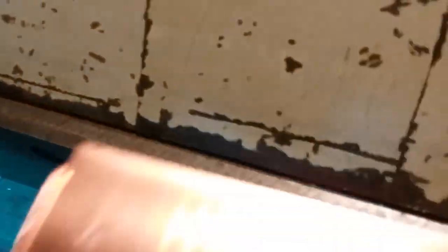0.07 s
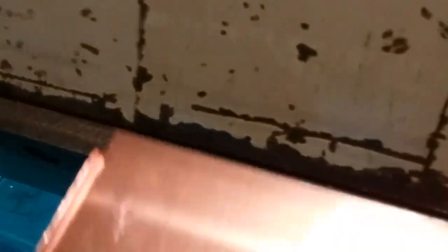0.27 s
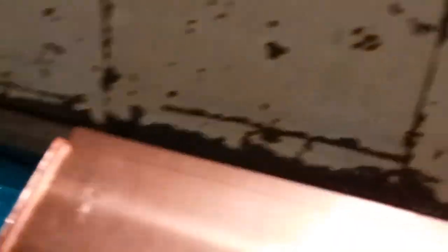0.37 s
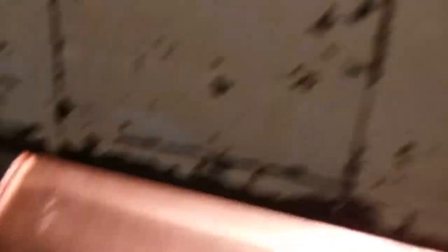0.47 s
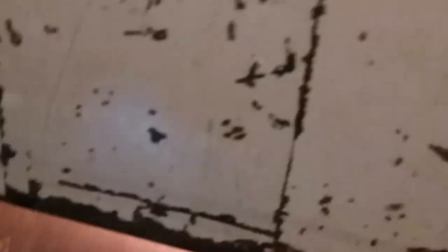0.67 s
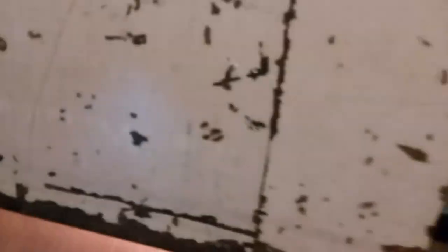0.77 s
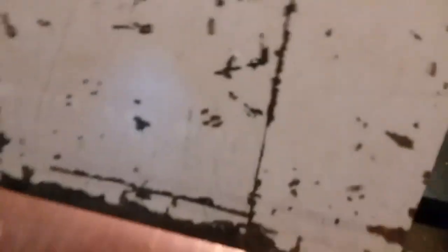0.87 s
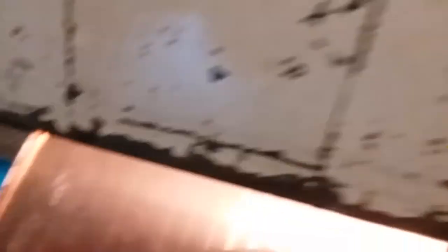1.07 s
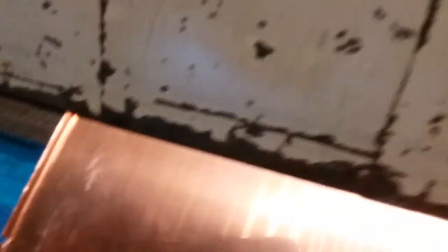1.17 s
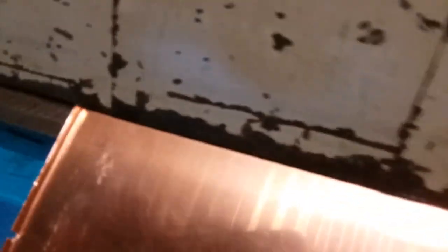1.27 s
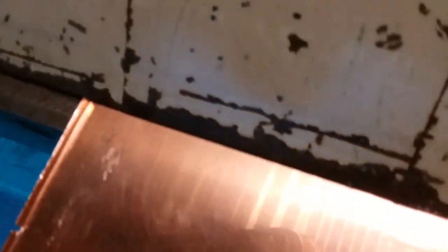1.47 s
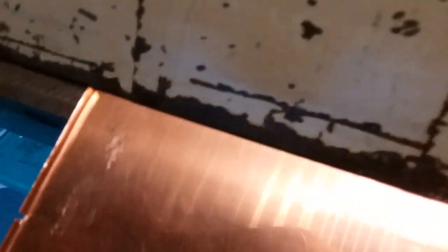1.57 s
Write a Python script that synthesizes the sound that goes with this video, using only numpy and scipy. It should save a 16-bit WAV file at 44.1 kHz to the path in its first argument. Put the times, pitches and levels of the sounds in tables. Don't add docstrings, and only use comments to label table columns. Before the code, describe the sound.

Metal sheet handled on a bending machine, close up: a faint earlier ring and gritty edge scrape, then a loud clattering slam at 0.2 s with rapid bounces. A mid-pitched clank follows at 0.35, dull thuds from 0.45, a lighter clink at 0.51 with short scrapes. A clamp snaps at 0.88, a tap at 1.0, then sparse, fading taps until about 1.57, over a short workshop tail and very quiet hum.

```python
import sys
import numpy as np
from scipy import signal
from scipy.fft import rfft, irfft
from scipy.io import wavfile

SR = 44100
rng = np.random.default_rng(int(sys.argv[2]) if len(sys.argv) > 2 else 0)


def dump_mix(stems):
    frames = np.atleast_2d(stems).T
    limited = np.clip(frames, -1, 1)
    pcm = np.round(limited * 32767).astype(np.int16)
    wavfile.write(sys.argv[1], SR, pcm)


def attenuation_scalar(level_db):
    decades = np.asarray(level_db, float) / 20
    return 10 ** decades


N = 70560
LEFT_LAG = 16


def evened(x):
    return x / np.sqrt(np.mean(x ** 2) + 1e-20)


def read(points, hz):
    f, value = np.transpose(points)
    return np.interp(np.log(hz + 1), np.log(f + 1), value)


def add(mix, s, sound, pan_db=0, lag=0):
    at = round(s * SR)
    sound = np.array([np.pad(sound[0], (lag, 0)), np.pad(sound[1], (0, lag))])
    sound = sound[:, max(-at, 0):] * attenuation_scalar(np.array([[.5], [-.5]]) * pan_db)
    part = mix[:, max(at, 0):][:, :sound.shape[1]]
    part += sound[:, :part.shape[1]]


# frequency in Hz, left-right likeness (0 to 1).
PORT_LIKENESS = [(60, 0.96), (500, 0.94), (1000, 0.5), (4000, 0.45), (16000, 0.45)]


def ports(hz, z):
    same = np.clip(read(PORT_LIKENESS, hz), 0, 1)
    return np.array([z[0], same * z[0] + np.sqrt(1 - same ** 2) * z[1]])


def coloured(x, tone):
    n = x.shape[-1]
    return irfft(rfft(x) * attenuation_scalar(read(tone, np.fft.rfftfreq(n, 1 / SR))), n)


def ring(hz, size, t60, size_n=11000, crack=1):
    rise_cycles = 0.96
    crack_height, crack_s = 0.59, 0.0035
    length = min(size_n, int(np.max(t60) * SR) + 400)
    t = np.arange(length, dtype=np.float32) / np.float32(SR)
    spin = 2j * np.pi * hz - np.log(1000) / np.maximum(t60, .004)
    waves = np.exp(np.outer(spin.astype(np.complex64), t))
    waves *= np.minimum(np.outer((hz / rise_cycles).astype(np.float32), t), 1)
    fade_out = np.minimum(4 - 4 * t / t[-1], 1)
    first_contact = 1 + crack * crack_height * np.exp(-t / crack_s)
    return (size.astype(np.complex64) @ waves).imag * fade_out * first_contact


def plate(tone, t60s, scale, tilt_db=0, lean=((1, 0), (2, 0)), count=260, size_n=7000, top=16100,
          pitch=None, crack=1):
    mode_spread_db, phase_spread = 4, .7
    pitch_db, pitch_octaves = 9, 0.2
    draw = rng.random((count, 4))
    u = (np.arange(count) + draw[:, 0]) / count
    hz = 50 + (top - 50) * u ** 2
    db = read(tone, hz) + 10 * np.log10(u + 0.015) + tilt_db * np.log2(hz / 1000)
    db += mode_spread_db * 2 * (draw[:, 1] - .5)
    if pitch:
        db += pitch_db * np.exp(-.5 * (np.log2(hz / pitch) / pitch_octaves) ** 2)
    starts = np.exp(2j * np.pi * phase_spread * (draw[:, 2:].T - .5))
    size = ports(hz, starts) * attenuation_scalar(db + np.outer([.5, -.5], read(lean, hz)))
    size = size / np.sqrt(0.28 * np.sum(abs(size) ** 2))
    return ring(hz, size, read(t60s, hz) * scale, size_n=size_n, crack=crack)


def tuned(modes, db):
    modes_apart, port_turn = .3, .12
    hz, level_db, t60 = np.transpose(modes)
    turn = modes_apart * rng.random(len(hz)) + port_turn * rng.uniform(-1, 1, (2, len(hz)))
    return ring(hz, np.exp(2j * np.pi * turn) * attenuation_scalar(level_db + db), t60, size_n=SR // 2)


# start in seconds, level in dB, ring scale.
SLAMS = [
    (0.2056, -17, 0.35),
    (0.207, -23.5, 0.83),
    (0.2141, -23.5, 1.54),
    (0.2268, -18.5, 0.62),
    (0.2299, -24.5, 0.73),
    (.239, -28, 0.73),
    (0.265, -35, 0.61),
    (0.276, -42.5, 0.12),
]
# frequency in Hz, level in dB.
SLAM_TONE = [(35, -34.5), (60, -11), (330, -4.5), (503, -7.5), (1860, -3), (3580, -10), (4120, -12),
             (5330, -12), (16000, -7)]
# frequency in Hz, T60 in seconds.
SLAM_T60 = [(80, 0.17), (400, 0.19), (2000, 0.2), (6000, 0.26), (16000, 0.11)]
# frequency in Hz, left minus right in dB.
SLAM_LEAN = [(60, -3.5), (240, -6.5), (950, 0), (3770, -2.5), (15000, -1.5)]
# frequency in Hz, level in dB, T60 in seconds.
SHEET_MODES = [(135, -4, .12), (318, -6, .14), (379, -7, .08), (836, -9, .09), (995, -2, .04),
               (1620, -1, .025), (1975, -1, .03), (2105, -9, .16), (2632, -10, .14), (3000, -5, .03),
               (3257, -12, .14), (4527, -12, .15)]


def slams():
    out = np.zeros((2, N))
    for s, db, scale in SLAMS:
        add(out, s, attenuation_scalar(db) * plate(SLAM_TONE, SLAM_T60, scale, lean=SLAM_LEAN, size_n=3200), lag=LEFT_LAG)
    for s, db, scale in SLAMS[:4:3]:
        add(out, s, tuned(SHEET_MODES, db - 9))
    return out


# level in dB, ring scale, left minus right in dB.
CLANK = (-22.5, 1, 0)
# frequency in Hz, level in dB.
CLANK_TONE = [(60, -22), (600, -8.5), (1400, -2), (2500, -8.5), (4300, -22.5), (5000, -30.5), (16000, -28)]
# frequency in Hz, T60 in seconds.
CLANK_T60 = [(80, 0.18), (500, 0.12), (2000, 0.17), (5000, 0.18), (16000, 0.12)]
# frequency in Hz, level in dB, T60 in seconds.
CLANK_MODES = [(280, -12, .1), (517, -13, .1), (716, -15, .08), (968, -11, .07), (1410, 0, .045),
               (1560, -2, .035), (1790, -8, .1), (1927, -12, .17), (2094, -12, .15), (2466, -13, .12),
               (3000, -7, .04)]


def clank():
    out, s = np.zeros((2, N)), .3542
    db, scale, pan_db = CLANK
    add(out, s, attenuation_scalar(db) * plate(CLANK_TONE, CLANK_T60, scale), pan_db, lag=LEFT_LAG)
    add(out, s, tuned(CLANK_MODES, -21.5), pan_db)
    return out


# level in dB, ring scale, left minus right in dB.
CLINK = (-32.5, 0.66, 0)
# frequency in Hz, level in dB.
CLINK_TONE = [(180, -38), (300, 3), (1530, 0.5), (2480, 2), (3080, -23), (3460, -22), (4370, -13.5),
              (16000, -13.5)]
# frequency in Hz, T60 in seconds.
CLINK_T60 = [(300, 0.0333), (2200, 0.42), (3500, 0.25), (16000, 0.057)]
# frequency in Hz, level in dB, T60 in seconds.
CLINK_MODES = [(920, -9, .04), (1986, -11, .1), (2207, -17, .2), (2509, 0, .07), (2805, -18, .1),
               (7790, -18, .05)]
# frequency in Hz, level in dB, T60 in seconds.
FRAME_MODES = [(588, -2, 1.06), (2150, -6, 0.68), (2160, -12, 1.06), (2240, -12.5, 0.71)]


def clink():
    out, s = np.zeros((2, N)), .5141
    db, scale, pan_db = CLINK
    add(out, s, attenuation_scalar(db) * plate(CLINK_TONE, CLINK_T60, scale), pan_db, lag=LEFT_LAG)
    add(out, s, tuned(CLINK_MODES, -26), pan_db)
    add(out, s, tuned(FRAME_MODES, -53.5))
    return out


# start in seconds, level in dB, ring scale.
THUDS = [(0.4499, -36, 0.75), (.467, -35, 1.5), (.479, -37, 0.72), (0.498, -37.5, 0.79), (.52, -40, 1.4),
         (.552, -42.5, 2.1), (.607, -44.5, 0.82), (.68, -56.5, 1.5), (.731, -49, 0.87), (.887, -44, 0.68),
         (0.9989, -45, 0.35), (1.244, -51, 0.41)]
# frequency in Hz, level in dB.
THUD_TONE = [(50, -25), (110, -8.5), (245, -3), (500, -16), (800, -21), (3000, -39.5)]
# frequency in Hz, T60 in seconds.
THUD_T60 = [(60, 0.13), (250, 0.16), (2500, 0.27)]
# frequency in Hz, left minus right in dB.
THUD_LEAN = [(60, 1.5), (250, -4), (1000, 1)]


def thuds():
    out = np.zeros((2, N))
    for s, db, scale in THUDS:
        blow = plate(THUD_TONE, THUD_T60, scale, lean=THUD_LEAN, count=60, top=3000, crack=0)
        add(out, s, attenuation_scalar(db) * blow)
    return out


# start in seconds, swell in seconds, fade in seconds, level in dB.
SCRAPES = [
    (-.03, 0.025, 0.047, -45.5),
    (0.018, 0.1, 0.055, -44.5),
    (0.331, 0.017, 0.013, -53),
    (0.38, 0.078, 0.056, -57),
    (.494, 0.0076, 0.024, -46.5),
    (0.577, 0.031, 0.0068, -49.5),
    (0.799, 0.049, 0.036, -65),
    (.13, 0.044, 0.06, -58),
]
# frequency in Hz, level in dB.
SCRAPE_TONE = [(35, -56.5), (60, -6), (666, -9.5), (749, -7.5), (2970, -14), (6900, -16), (9350, -17.5),
               (11800, -14.5), (16000, -15)]
# frequency in Hz, width in Hz, level in dB.
SCRAPE_PEAKS = [(1955, 60, -2.5), (2270, 50, -3.5), (2950, 130, -9)]


def scrapes():
    slips_per_s, slip_spread_db, ring_db = 2200, -0.5, -11.5
    slips = (rng.random((2, N)) < slips_per_s / SR) * rng.choice([-1., 1.], (2, N))
    slips = slips * attenuation_scalar(slip_spread_db * np.minimum(rng.exponential(1, (2, N)), 2))
    hz = np.fft.rfftfreq(N, 1 / SR)
    peaks = sum(attenuation_scalar(db) / (1 + 2j * (hz - f) / w) for f, w, db in SCRAPE_PEAKS)
    z = ports(hz, rfft(evened(slips) + 0.65 * rng.standard_normal((2, N))))
    grit = evened(irfft(z * attenuation_scalar(read(SCRAPE_TONE, hz)), N))
    grit = grit + attenuation_scalar(ring_db) * evened(irfft(z * peaks, N))
    t, pressure = np.arange(N) / SR, np.zeros((2, N))
    for s, swell, fade, db in SCRAPES:
        pressure += attenuation_scalar(db) * np.interp(t, [s, s + swell, s + swell + fade], [0, 1, 0])
    return grit * pressure


def pitched_blows(rows, tone, t60s):
    out = np.zeros((2, N))
    for s, db, tilt_db, scale, pitch in rows:
        add(out, s, attenuation_scalar(db) * plate(tone, t60s, scale, tilt_db, count=160, size_n=10000, pitch=pitch))
    return out


# start in seconds, level in dB, brightness in dB per octave, ring scale,
# loudest pitch in Hz.
KNOCKS = [
    (.124, -47, 0.5, 0.15, 2900),
    (.538, -49, 4, 0.18, 4830),
    (.6065, -41.5, -2, 0.65, 4470),
    (.863, -53.5, -0.7, 1.74, 2148),
    (.8822, -42.5, 1.5, 1.4, 1530),
    (.8852, -39, 4.5, 1.42, 897),
    (.928, -56.5, 0, 2.04, 975),
]
# frequency in Hz, level in dB.
KNOCK_TONE = [(35, -39.5), (60, -9.5), (330, 0.5), (715, -12.5), (903, -7.5), (2000, -9), (2410, -20),
              (5590, -20), (16000, -30)]
# frequency in Hz, T60 in seconds.
KNOCK_T60 = [(80, 0.085), (500, 0.082), (2000, 0.059), (16000, 0.06)]
# frequency in Hz, level in dB, T60 in seconds.
CLAMP_MODES = [(145, -3, .13), (334, -2, .07), (905, -1, .085), (1450, -4, .06), (2046, -8, .06),
               (3036, -11, .036), (5631, -9, .03), (7600, -16, .02), (6660, -18, .03)]


def clamp():
    out = pitched_blows(KNOCKS, KNOCK_TONE, KNOCK_T60)
    add(out, .8835, tuned(CLAMP_MODES, -39))
    return out


# start in seconds, level in dB, brightness in dB per octave, ring scale,
# loudest pitch in Hz.
TAPS = [
    (.9985, -46.5, 0, 0.4, 892),
    (1.035, -57, -3, 0.8, 2100),
    (1.1475, -54, 0.75, 0.9, 542),
    (1.168, -58, 1, 1.64, 904),
    (1.243, -56, -1.4, 0.69, 836),
    (1.394, -56.5, -2.2, 0.564, 1416),
    (1.5005, -55.5, -1.25, 1.3, 620),
    (1.565, -67, 4.5, 1.4, 1305),
]
# frequency in Hz, level in dB.
TAP_TONE = [(60, -5), (400, 1), (550, -2.5), (1500, -2.5), (2300, -9.5), (3000, -17), (8000, -25),
            (16000, -36.5)]
# frequency in Hz, T60 in seconds.
TAP_T60 = [(100, 0.23), (1000, 0.22), (16000, 0.18)]


def lever():
    return pitched_blows(TAPS, TAP_TONE, TAP_T60)


# start in seconds, pitch in Hz, level in dB, T60 in seconds.
RATTLES = [(0.263, 1020, -29, 0.025), (.27, 1413, -32.5, 0.036), (0.274, 1640, -31, 0.021),
           (.28, 900, -39, .08), (.293, 2200, -43.5, 0.013), (.306, 930, -44.5, 0.078),
           (0.4504, 254, -25, 0.05), (0.514, 5830, -55, 0.057), (.515, 610, -35, 0.037),
           (.731, 696.6, -53, 0.031), (.497, 260, -30.5, 0.049), (.498, 2950, -48.5, .03),
           (.123, 2960, -46, 0.078), (.36, 80, -44.5, 0.18), (.745, 75, -54, .15), (1.17, 70, -62, .12),
           (1.227, 1300, -56, 0.025), (1.243, 826, -60.5, .06), (1.394, 1010, -55.5, 0.041),
           (1.5, 2050, -58.5, 0.035), (.999, 602, -48.5, 0.027), (.927, 902, -54.5, 0.03)]


def rattles():
    out = np.zeros((2, N))
    for s, hz, db, t60 in RATTLES:
        add(out, s, tuned([(hz, 0, t60)], db))
    return out


# frequency in Hz, level in dB, T60 in seconds.
EARLIER_MODES = [(108, -12, 0.99), (324, -15, 0.38), (915, 1, 0.33), (1070, 2.5, 0.1), (1550, -8.5, 0.27),
                 (2300, -13, .12), (3870, -11.5, 0.11)]


def earlier_blow():
    out = np.zeros((2, N))
    add(out, -.01, tuned(EARLIER_MODES, -42.5))
    return out


# frequency in Hz, T60 in seconds.
SHOP_T60 = [(80, 1), (300, 1), (1000, 0.17), (2200, 0.57), (4500, 0.19), (16000, 0.65)]


def shop(x):
    taps = np.zeros((2, SR))
    at = np.arange(300, SR - 20, 20)
    signs = rng.choice([-1., 1.], (2, len(at)))
    np.put_along_axis(taps, at + rng.integers(0, 20, (2, len(at))), signs, 1)
    hz, t, z = signal.stft(taps, SR, nperseg=512)
    z = ports(hz[:, None], z) * attenuation_scalar(-60 * t / np.maximum(read(SHOP_T60, hz), .05)[:, None])
    tail = signal.istft(z, SR, nperseg=512)[1]
    return signal.fftconvolve(x, tail / np.linalg.norm(tail[0]), axes=1)[:, :N]


# frequency in Hz, level in dB.
AIR = [(30, -17), (110, -1), (400, -12.5), (960, -9), (2600, -19.5), (8000, -22), (16000, -25.5)]


def air():
    hz = np.fft.rfftfreq(N, 1 / SR)
    z = ports(hz, rfft(rng.standard_normal((2, N))))
    return attenuation_scalar(-72) * evened(irfft(z * attenuation_scalar(read(AIR, hz)), N))


def scene():
    sheet = slams() + clank() + clink() + thuds() + scrapes()
    machine = clamp() + lever() + rattles() + earlier_blow()
    near = sheet + machine
    return near + attenuation_scalar(-16) * shop(near.mean(0, keepdims=True)) + air()


def top_cut(x):
    return signal.sosfilt(signal.butter(12, 16970, fs=SR, output="sos"), x)


# frequency in Hz, level in dB.
MICROPHONE = [(25, -21), (70, 4), (8500, 2), (9600, -5.5), (12000, -1.5), (15500, 1.5)]


def record(dry):
    low_pass = signal.firwin(255, 16100, window=("kaiser", 8), fs=SR)
    mix = signal.oaconvolve(coloured(dry, MICROPHONE), low_pass[None], "same", axes=1)
    return top_cut(mix)


dry = scene()
out = record(dry)
dump_mix(out)
```